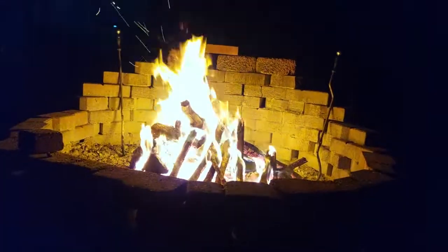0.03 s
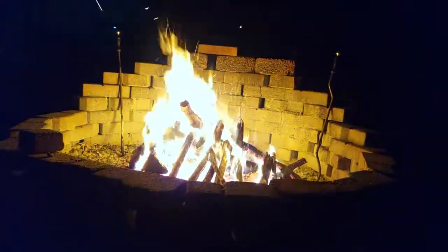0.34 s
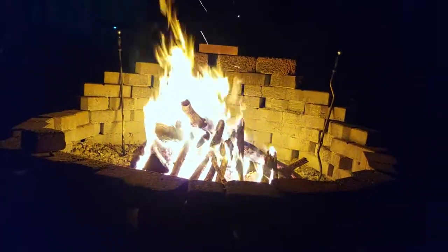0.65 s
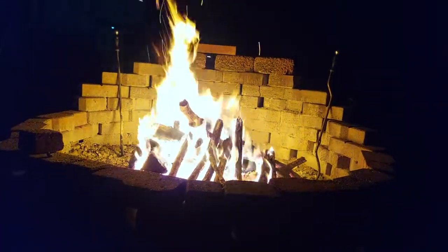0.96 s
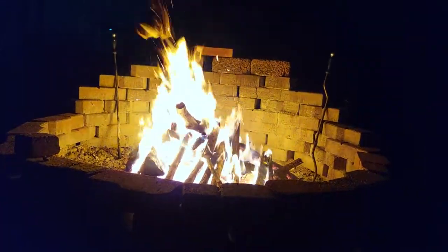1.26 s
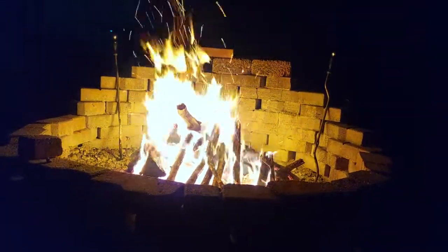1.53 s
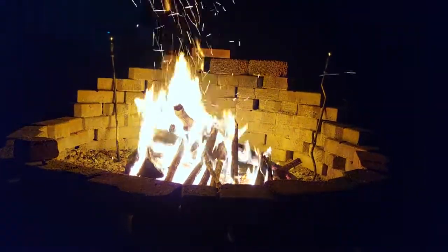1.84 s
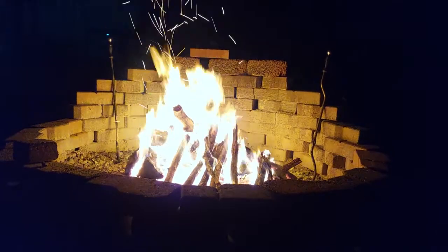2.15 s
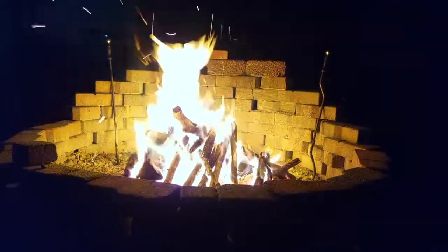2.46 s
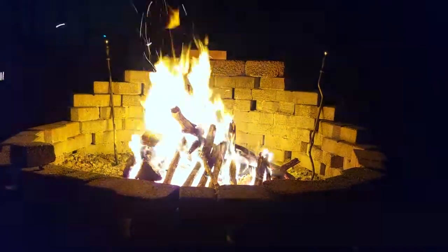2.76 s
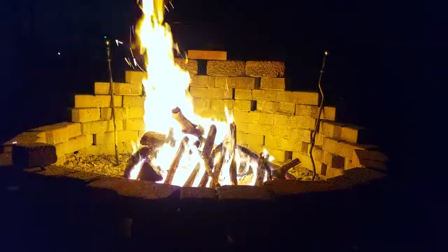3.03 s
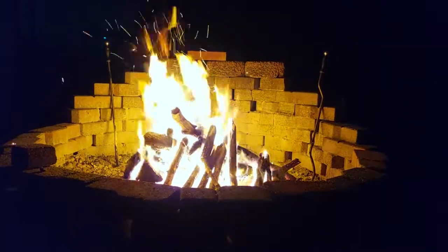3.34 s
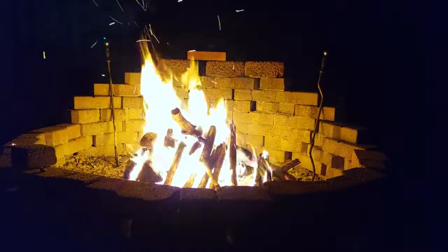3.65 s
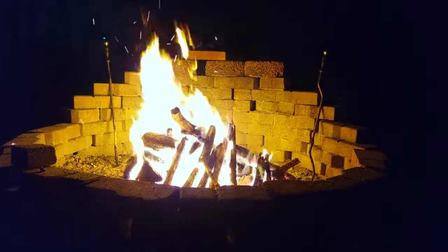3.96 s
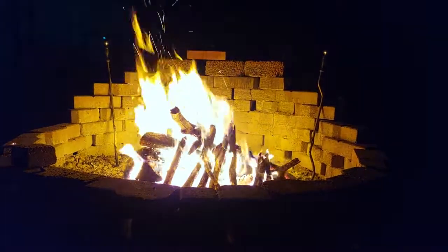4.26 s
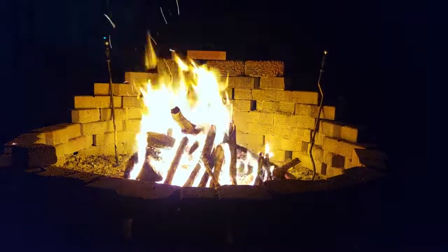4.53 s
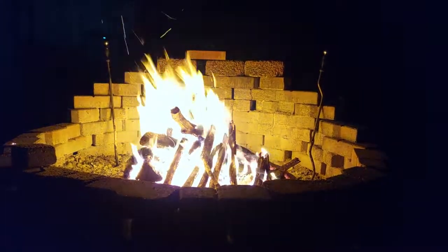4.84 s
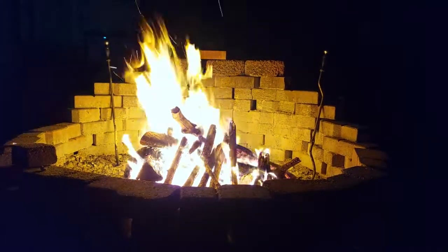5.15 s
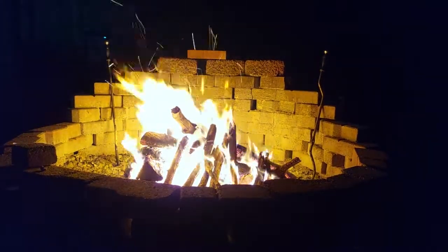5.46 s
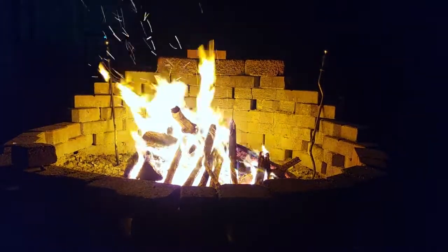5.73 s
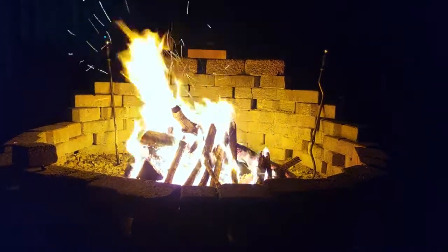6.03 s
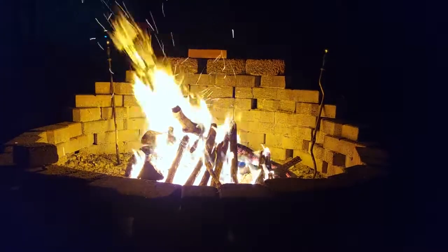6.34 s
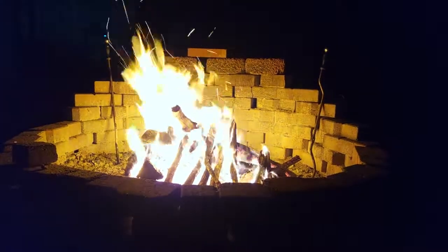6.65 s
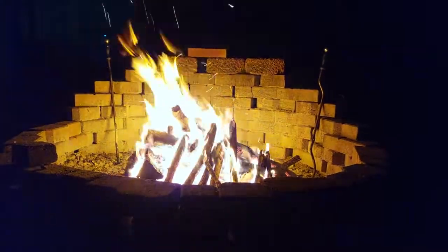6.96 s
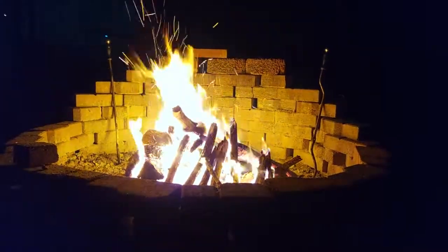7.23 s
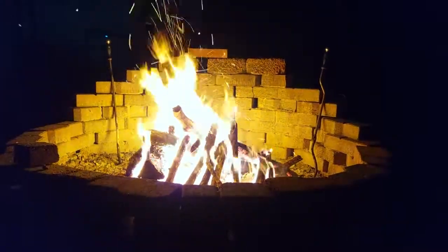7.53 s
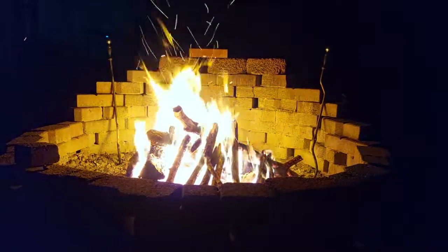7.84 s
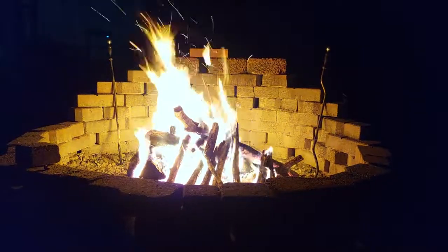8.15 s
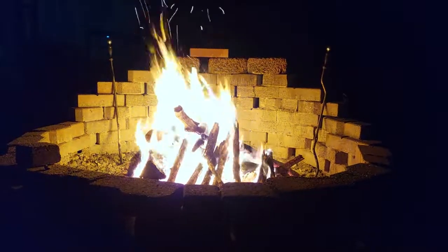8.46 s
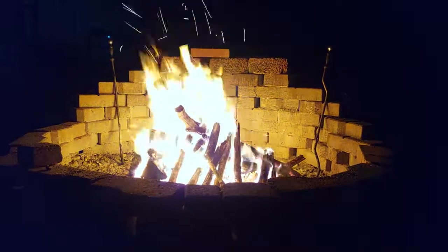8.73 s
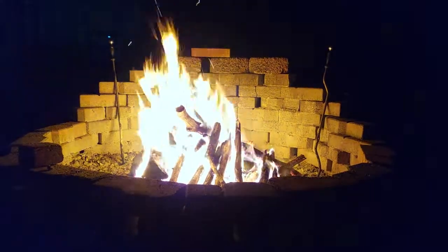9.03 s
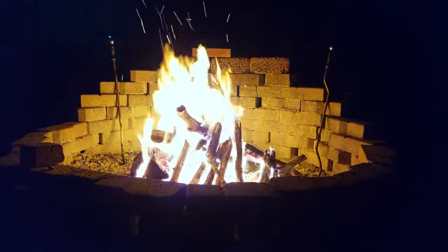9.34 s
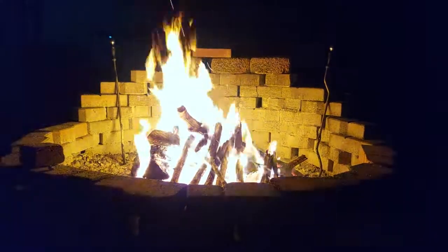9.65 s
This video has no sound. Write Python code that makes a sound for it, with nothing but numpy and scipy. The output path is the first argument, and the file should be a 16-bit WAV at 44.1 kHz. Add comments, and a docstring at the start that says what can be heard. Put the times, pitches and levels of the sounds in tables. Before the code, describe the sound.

A wood fire crackles close by in an outdoor brick pit for about ten seconds. Sharp, irregular pops come many times a second, some bright, some dull, with tiny cracks around them and a faint echo from the yard. Underneath, the flames rumble low and hiss softly. A log gives a faint, high, fluttering whistle from 0.5 to 1 second. Two pops at about 1.3 and 1.5 seconds carry a low thump on the left, the second releasing a tiny spurt of gas. The rumble and hiss then drop for about a second and the pops thin out. By 3 seconds the dense crackle is back, with strong snaps near 5.4 and 6.1. Hollow knocks sound between the logs from 7.2 to 8 seconds. The faint whistle returns around 8.2, a softer thump comes at 8.4, and a loud dull pop lands near 9.7.

```python
"""Sharp pops and crackles come from a wood fire in a brick pit, outdoors at night.
Pockets of steam burst the wood; each pop bounces off the bricks and echoes faintly round the yard,
with small cracks crowding round it. A few pops knock hollow between the logs, three come with a low
thump on the left, and one lets out a spurt of gas. A log whistles now and then. Underneath, the
flames rumble and hiss. After the biggest thump, the rumble and hiss drop for about a second."""
import sys
import numpy as np
from scipy import signal
from scipy.fft import rfft, irfft, next_fast_len
from scipy.io import wavfile
from scipy.ndimage import uniform_filter1d

SR = 44100
rng = np.random.default_rng(int(sys.argv[2]) if len(sys.argv) > 2 else 0)


def store_pcm(level_fs):
    """Save levels as 16-bit WAV."""
    pcm = np.round(np.clip(level_fs, -1, 1) * 32767).astype(np.int16)
    wavfile.write(sys.argv[1], SR, np.atleast_2d(pcm).T)


N = 436149
TIME = np.arange(N) / SR
POP_SAMPLES = 1024


# Loud bursts in the wood: t/s, level/dB, brightness/dB (treble compared with bass)
STEAM_POPS = [(0.0369, -13, 12), (0.0811, -20, -5), (0.1607, -18, 4), (0.2568, -13.5, -2),
              (0.2806, -9.5, 8), (0.3034, -9.5, 12), (0.3304, -15, 3), (0.4964, -16, 1), (0.8086, -17, -22),
              (0.821, -17, -11), (0.9577, -10.5, 13.5), (1.0963, -8, 3), (1.1531, -13.5, -8),
              (1.1845, -2.5, 5.5), (1.2203, -10, -3), (1.2818, -5.5, 6), (1.2993, -25, 8),
              (1.3173, -9.5, 5), (1.3246, -13, 2), (1.392, -9.5, 2), (1.4464, -6, 4), (1.5379, -6, 15),
              (1.6234, -15.5, 6), (1.8696, -8, -8.5), (1.9313, -26.5, 0), (2.1524, -34.5, 2.5),
              (2.2977, -21, 9), (2.4794, -23, 9), (2.5099, -24.5, 6), (2.5568, -14.5, 7),
              (2.5755, -20.5, 5), (2.6179, -22.5, -5), (2.7118, -22.5, 11), (2.7933, -18, -5),
              (2.8037, -16, -0.5), (2.8736, -14.5, 1), (2.9105, -19, 14), (2.9422, -15.5, -1),
              (2.9539, -21.5, 8), (3.0077, -9, -5), (3.0585, -18, 0), (3.0777, -11, 9), (3.2019, -8, -3),
              (3.22, -14.5, 0), (3.249, -8.5, 3), (3.3827, -14, -6), (3.4555, -11.5, 3.5), (3.4891, -21, 3),
              (3.5555, -7, 4.5), (3.593, -14, 6), (3.6435, -17.5, 1.5), (3.7102, -15.5, 4.0),
              (3.833, -21, -15.5), (3.9059, -12.5, -10), (3.9126, -12.5, -11), (3.9231, -18.5, 0),
              (3.9859, -18, -13), (3.9904, -12.5, -6.5), (4.0191, -14, 4), (4.0804, -9.5, 4),
              (4.0906, -14.5, 2), (4.1311, -7, 7), (4.1463, -14.5, 1), (4.1869, -21, 9),
              (4.303, -20.5, -13), (4.3143, -13.5, 2), (4.5504, -16, 6), (4.5621, -20, -5),
              (4.5749, -18, 0), (4.594, -10.5, -7.5), (4.6446, -16.5, 3), (4.6798, -9.5, -2),
              (4.7372, -13.5, 5), (4.801, -19, 12), (4.8592, -15.5, 2), (4.9166, -5.5, 7),
              (5.0198, -17.5, 3), (5.1447, -14.5, 11), (5.1784, -6.5, 1), (5.198, -9.5, 6),
              (5.2054, -11.5, -18), (5.2204, -14.5, 4), (5.2903, -11.5, 6), (5.3632, -13, 9),
              (5.3761, -8, 2.5), (5.4377, -2.5, 6.5), (5.56, -22.5, -8), (5.6826, -20, 0), (5.7572, -16, 3),
              (5.7821, -13.5, 6), (5.8012, -15, 2), (5.9449, -22, -13), (5.9575, -16.5, 5),
              (6.0541, -17.5, 2), (6.0816, -1.5, 4), (6.1322, -14.5, -2), (6.1728, -8.5, 7),
              (6.1861, -22, -4), (6.2185, -18.5, 18), (6.2434, -17, 1), (6.2777, -9.5, 8),
              (6.2964, -16, -5), (6.3383, -15, -2), (6.356, -9, 12), (6.3766, -15.5, 4), (6.413, -9.5, 1),
              (6.4722, -4, 1), (6.5755, -14.5, 2), (6.5826, -8.5, -3), (6.6791, -12.5, 6),
              (6.7218, -13.0, -0.5), (6.752, -18, -4), (6.7752, -18, -4), (6.7908, -14, 3),
              (6.8014, -12.5, -7), (6.8122, -10, 0), (6.9374, -16.5, 7), (6.998, -7.5, 1.5),
              (7.0202, -16.5, -1), (7.0614, -11, 2), (7.083, -8.5, 4.5), (7.1132, -16.5, 4),
              (7.1419, -11.5, 8.5), (7.1688, -12, -3), (7.1862, -3.5, -22), (7.2271, -5.5, 4),
              (7.2396, -3.0, 2.5), (7.2992, -14.5, -10), (7.3298, -18, -4), (7.3361, -12.5, -2),
              (7.3522, -8.5, -3), (7.4323, -6.5, 15), (7.4405, -15.5, -7), (7.526, -17.5, 4),
              (7.5699, -15.5, 8), (7.6089, -3, 11), (7.6421, -11.5, 4), (7.6806, -8, -6),
              (7.9077, -18.5, 1), (7.9547, -17.5, -28), (8.0733, -11, 10), (8.0907, -16.5, 9),
              (8.1673, -15, 10), (8.1997, -7.5, -5), (8.2264, -17.5, 1), (8.2979, -9, 6), (8.3452, -17, -4),
              (8.4268, -3, 4), (8.493, -20, -8), (8.6893, -12.5, -12), (8.7319, -10.5, 9),
              (8.7844, -13, 12), (9.0133, -9.5, 10), (9.0195, -13.5, 0), (9.075, -10, -3.5),
              (9.1476, -8.5, 3.5), (9.1944, -8.5, -1), (9.3265, -8.5, 4), (9.478, -18, 5),
              (9.5438, -11, 5.5), (9.5536, -16, -11), (9.5693, -11, -4), (9.6243, -5.5, -12.5),
              (9.6433, -10, 1), (9.6979, -1, -15.5), (9.727, -11.5, 0), (9.7892, -14.5, -2)]

def pops():
    """Trapped steam bursts the wood, and splinters follow each burst."""
    return bursts(STEAM_POPS) + bursts(splinters(STEAM_POPS))


def bursts(rows, spike_hz=4500, tear_s=0.00055, tear_hz=3000,
           wall_s=0.002456, wall_spread_s=0.00026, wall_db=-6, wall_cut_hz=1500, dull_bounce=0.074,
           scatter_db=-9, scatter_s=0.00032, pit_db=-12, pit_s=0.0042,
           pan_db=1.67, lag_s=.00005, low_hz=360):
    """Each burst is a pressure spike and a brief tearing of fibres, thrown back by the brick pit."""
    start_s, level_db, bright_db = np.transpose(rows)[:, :, None, None]
    t, hz = np.arange(POP_SAMPLES) / SR, np.fft.rfftfreq(POP_SAMPLES, 1 / SR)
    white = rng.standard_normal((len(rows), 5, POP_SAMPLES))
    depth, pan, bearing = rng.standard_normal((len(rows), 3)).T[:, :, None, None]
    # the spike gives the body of the sound, the tearing its treble
    spike = 1 / (1 + 1j * hz / spike_hz)
    fibres = unit_energy(white[:, :1] * t * np.exp(-2 * t / tear_s))
    tear = rfft(fibres) * 1j * hz / (tear_hz + 1j * hz)
    # low notes bounce to and fro between wall and logs, so dull pops ring hollow
    bounce_s = np.abs(wall_s + wall_spread_s * depth)
    bounce_db = np.minimum(wall_db - dull_bounce * bright_db, -2)
    bounce = from_db(bounce_db) * np.exp(-2j * np.pi * hz * bounce_s) / (1 + 1j * hz / wall_cut_hz)
    crack = (spike + tear) / (1 - bounce)
    # rough brick scatters the treble
    scatter = from_db(scatter_db) * unit_energy(white[:, 1:3] * np.exp(-np.abs(t - bounce_s) / scatter_s))
    pit = from_db(pit_db) * unit_energy(white[:, 3:] * np.minimum(t / bounce_s, 1) * np.exp(-t / pit_s))
    # large pockets give a dull knock, small ones a bright snap
    tilt = at_hz([(1700, -.5), (12000, .5)], hz)
    colour = causal(level_db + bright_db * tilt) * from_db(pan_db * pan * np.array([[1], [-1]]))
    # the sound reaches the left side first
    delay_s = np.round(lag_s * SR * np.abs(1 + 0.37 * bearing)) / SR * np.array([[0], [1]])
    waves = irfft(colour * (crack + rfft(scatter + pit)) * np.exp(-2j * np.pi * hz * delay_s))
    out = np.zeros((2, N + POP_SAMPLES))
    for at, wave in zip(np.clip(start_s.ravel() * SR, 0, N).astype(int), waves):
        out[:, at:at + POP_SAMPLES] += wave
    return high_pass(out[:, :N], low_hz)


def splinters(rows, delay_s=0.0038, spread=.8, level_db=-15, fade_db=3, bright_db=-2):
    """Wood gives way in steps: three weaker, duller cracks trail each burst, the later the fainter."""
    parents = np.repeat(np.array(rows), repeats=3, axis=0)
    lateness, size = np.clip(rng.standard_normal((len(parents), 2)), -2, 2).T
    after_s = delay_s * np.exp(spread * lateness)
    softer_db = level_db + fade_db * (size - lateness) / 2
    return parents + np.c_[after_s, softer_db, np.full(len(parents), bright_db)]


def ticks(hiss_db, per_s=24, level_db=-31.5, spread_db=6.5, follow=0.11, bright_db=2, bright_spread_db=7):
    """Small splinters snap at random, more often and harder when the hiss is louder."""
    louder_db = hiss_db - np.median(hiss_db)
    at = np.flatnonzero(rng.random(N) < per_s * from_db(louder_db / 2) / SR)
    size, colour = np.clip(rng.standard_normal((len(at), 2)), -2, 2).T
    snap_db = level_db + follow * louder_db[at] + spread_db * size
    return bursts(np.c_[at / SR, snap_db, bright_db + bright_spread_db * colour])


# Hollow knocks between the logs: t/s, level/dB, f/Hz
LOG_KNOCKS = [(7.1885, -16, 797), (7.611, -27, 730), (7.9565, -28, 960), (9.7, -36.5, 980)]
# Notes a gap rings with: multiple of the knock's f, level/dB, t/s to fade by 60 dB
GAP_NOTES = [(.59, -0.5, 0.022), (1, 1, 0.018), (1.49, 0, .016)]

def knocks(swell_s=0.00088):
    """A deep burst sets the air in a gap between the logs ringing."""
    t = np.arange(4 * POP_SAMPLES) / SR
    out = np.zeros(N + len(t))
    for start_s, level_db, hz in LOG_KNOCKS:
        ring = sum(from_db(db - 60 * t / fade_s) * np.sin(2 * np.pi * hz * ratio * t)
                   for ratio, db, fade_s in GAP_NOTES)
        at = int(start_s * SR)
        out[at:at + len(t)] += from_db(level_db) * ring * (1 - np.exp(-t / swell_s))
    return out[:N]


# Pushes of air that come with three of the pops: t/s, level/dB (before filtering)
AIR_PUSHES = [(1.3172, -9.5), (1.5378, -2.5), (8.4272, -13)]

def thumps(push_s=0.0016, low_hz=44, right_db=-32, echo_s=0.0123, echo_db=-3, echo_cut_hz=190):
    """A short push of air and its dull echo make the left microphone swing at its lowest notes."""
    push = np.zeros(N)
    for start_s, level_db in AIR_PUSHES:
        fade = np.exp(-np.minimum(np.abs(TIME - start_s) / push_s, 40))
        push += from_db(level_db) * (TIME >= start_s) * fade
    echo = low_pass(np.interp(TIME - echo_s, TIME, push), echo_cut_hz)
    push += from_db(echo_db) * low_pass(echo, echo_cut_hz)
    rounded = uniform_filter1d(push, size=12)
    return high_pass(rounded, low_hz, order=4) * np.array([[1], [from_db(right_db)]])


def spurt(start_s=1.557, length_s=0.032, level_db=-47.5, attack_s=.006, release_s=0.036, low_hz=3500):
    """Gas rushes out of the pocket that the biggest thump opens."""
    rush = rms_one(high_pass(rng.standard_normal((2, N)), low_hz))
    return from_db(level_db) * envelope(start_s, length_s, attack_s, release_s) * rush


# Steam leaving a log: t/s, length/s, f/Hz, level/dB
STEAM_JETS = [(.5, .59, 3760, -65), (3.38, 0.46, 3980, -73), (8.198, .62, 3800, -67), (9.0, 0.5, 4000, -77)]

def steam_jet(leak_hz=3760, leak_db=-89, rise_hz_per_s=150):
    """The whistle's pitch and strength follow the steam pressure, then sink back to a faint leak."""
    pitch, strength = np.full(N, float(leak_hz)), np.full(N, from_db(leak_db))
    for start_s, length_s, hz, level_db in STEAM_JETS:
        pressure = envelope(start_s, length_s, attack_s=0.094, release_s=0.06)
        pitch += (hz - leak_hz + rise_hz_per_s * (TIME - start_s)) * pressure
        strength += from_db(level_db) * pressure ** 2
    return pitch, strength


def whistle(flutter_hz=28, swing_hz=55, swing_db=5.5, rasp_hz=192, rasp_depth=0.47):
    """A raspy steam jet flutters in quick, even pulses, each both higher and louder."""
    pitch, strength = steam_jet()
    flutter = sine(flutter_hz * (1 + 0.039 * drift(2.5)))
    jet = sine(pitch + swing_hz * (flutter + .5 * drift(rasp_hz)))
    # sap bubbling in the crack chops the jet
    chop = 1 + rasp_depth * sine(rasp_hz * (1 + 0.124 * drift(25)))
    return strength * rms_one(jet * chop * from_db(swing_db * flutter))


# How loud the rumble and hiss are: t/s, rumble level/dB, hiss level/dB
FLAME_LEVELS = [(0.0, -51, -61), (0.58, -51, -62.5), (1.38, -48.5, -58), (1.65, -61.5, -74),
                (2.53, -64.5, -73), (3.03, -56, -63.5), (3.47, -50.5, -62.5), (5.78, -52, -64.5),
                (7.13, -49, -59.5), (7.63, -49.5, -61), (8.85, -51.5, -66), (9.42, -54.5, -62),
                (9.89, -50, -58)]
# Tone of the rumble and of the hiss: f/Hz, relative level/dB
RUMBLE_TONE = [(20, -52), (35, -9), (62, -2), (110, 3), (160, -3), (220, -8), (330, -12.5), (500, -16.5),
               (900, -45.5)]
HISS_TONE = [(200, 1.5), (450, 2.5), (600, 4), (800, 8.5), (1000, 5), (1700, 3.5), (2600, -7.5), (3700, -3),
             (4400, -28.5), (7300, -41.5), (9500, -28), (16000, -31)]

def flames(rumble_db, hiss_db, rumble_gain_db=1, hiss_gain_db=-1, surge_db=2.06, flicker_db=2.5):
    """Swirling, burning air rumbles; escaping gas hisses."""
    rumble = from_db(rumble_db + rumble_gain_db + surge_db * drift(18)) * noise(RUMBLE_TONE, side_db=-15.5)
    hiss = from_db(hiss_db + hiss_gain_db + flicker_db * drift(11.5)) * noise(HISS_TONE, side_db=2.5)
    return rumble + hiss


def yard(x, first_s=0.028, fade_s=0.31, tail_db=-21, slap_db=-28, slap_s=0.00094,
         low_hz=700, air_cut_hz=11000):
    """A faint slap comes back from the nearest surface, then a thin spray of farther echoes."""
    t = np.arange(SR // 2) / SR
    age = np.maximum(t - first_s, 0)
    spray = rng.standard_normal((2, len(t))) * (t > first_s)
    tail = from_db(tail_db) * unit_energy(spray * from_db(-60 * age / fade_s))
    slap = from_db(slap_db) * unit_energy(spray * np.exp(-age / slap_s))
    echo = low_pass(tail + slap, air_cut_hz)
    return high_pass(signal.fftconvolve(x, echo, axes=1)[:, :N], low_hz, order=1)


def from_db(db):
    return 10 ** (np.asarray(db) / 20)


def rms_one(x):
    """Scale to an average power of 1."""
    return x / np.sqrt(np.mean(x ** 2) + 1e-20)


def unit_energy(x):
    return x / np.sqrt(np.sum(x ** 2, axis=-1, keepdims=True) + 1e-20)


def sine(hz):
    """A pure tone that follows a changing pitch."""
    return np.sin(2 * np.pi * np.cumsum(hz) / SR)


def envelope(start_s, length_s, attack_s, release_s):
    """A straight rise, a hold until the length is over, then a fade."""
    age = TIME - start_s
    return np.clip(age / attack_s, 0, 1) * np.exp(-np.clip((age - length_s) / release_s, 0, 40))


def in_time(rows):
    """Join a table's points over time, one curve per column."""
    times, *columns = np.transpose(rows)
    return [np.interp(TIME, times, c) for c in columns]


def at_hz(points, hz):
    """Join a table's points over frequency, with octaves evenly spaced."""
    at, *columns = np.transpose(points)
    return np.array([np.interp(np.log(hz + 1), np.log(at), c) for c in columns])


def causal(db):
    """A filter with these levels in which nothing sounds early (minimum phase)."""
    cepstrum = irfft(np.log(from_db(db)))
    half = cepstrum.shape[-1] // 2
    return np.exp(rfft(cepstrum * np.r_[1, np.full(half - 1, 2), 1, np.zeros(half - 1)]))


def high_pass(x, hz, order=2):
    return signal.sosfilt(signal.butter(order, hz, "high", fs=SR, output="sos"), x + 1e-18)


def low_pass(x, hz):
    return signal.sosfilt(signal.butter(1, hz, fs=SR, output="sos"), x + 1e-18)


def drift(rate):
    """A smooth random wobble of size about 1 that changes about rate times a second."""
    hz = np.fft.rfftfreq(N, 1 / SR)[:2000]
    slow = irfft(rfft(rng.standard_normal(3998)) / (1 + (hz / rate) ** 2))
    return np.interp(TIME, np.linspace(0, N / SR, len(slow)), rms_one(slow))


def noise(tone, side_db):
    """Stereo noise with the given tone; more side_db makes it wider."""
    size = next_fast_len(N)
    colour = from_db(at_hz(tone, np.fft.rfftfreq(size, 1 / SR)))
    mid, side = irfft(rfft(rng.standard_normal((2, size))) * colour, size)[:, :N]
    return rms_one(mid) + from_db(side_db) * rms_one(side) * np.array([[1], [-1]])


def scene():
    """The crackle and its echo in the yard, over the sounds of burning."""
    rumble_db, hiss_db = in_time(FLAME_LEVELS)
    popping = pops() + knocks()
    burning = flames(rumble_db, hiss_db) + whistle() + spurt() + thumps()
    crackle = popping + ticks(hiss_db)
    return crackle + yard(crackle) + burning


# Tone of the two microphone openings: f/Hz, left level/dB, right level/dB
MIC_TONE = [(141, 2, -0.5), (615, -0.5, -1.5), (1190, 2, -5.5), (2035, 4, -1.5), (2244, -3, -4),
            (3220, 5.5, -3), (4250, -3.5, 1), (6220, 7.5, 2), (7870, 8, -20.5), (8780, -3.5, -6.5),
            (10700, 1.5, -7), (12100, 6, 2.5), (15700, 1.5, -5.5)]

def record(dry, cutoff_hz=16100):
    """Each microphone opening colours the sound in its own way; the highest treble is cut."""
    openings = irfft(causal(at_hz(MIC_TONE, np.fft.rfftfreq(POP_SAMPLES, 1 / SR))))
    heard = signal.fftconvolve(dry, openings, axes=1)[:, :N]
    return signal.sosfilt(signal.ellip(10, .3, 80, cutoff_hz, fs=SR, output="sos"), heard)


dry = scene()
out = record(dry)
store_pcm(out)
```